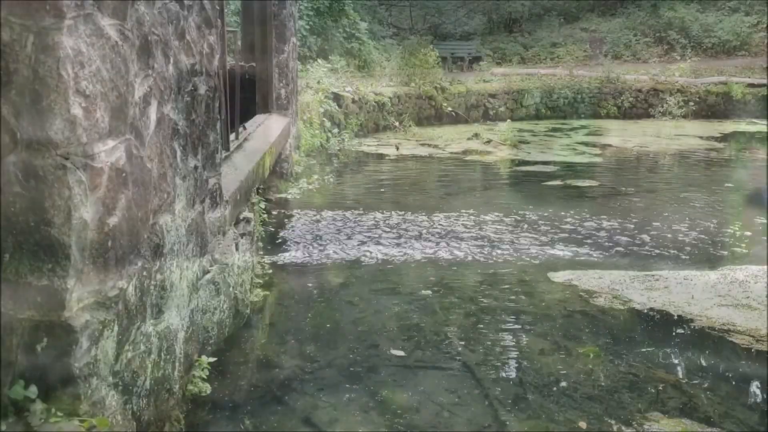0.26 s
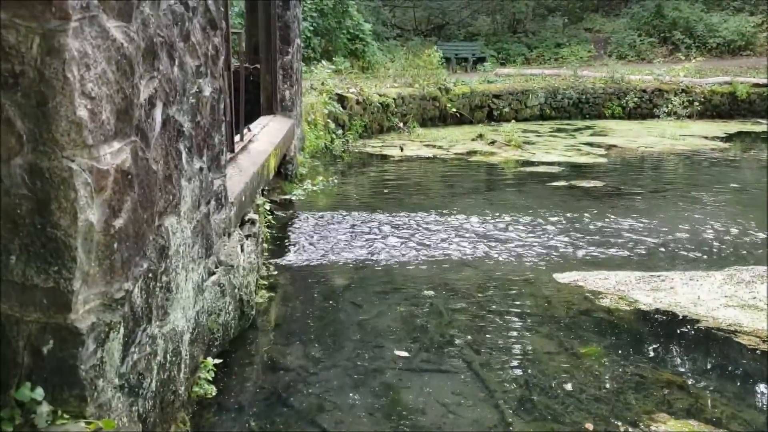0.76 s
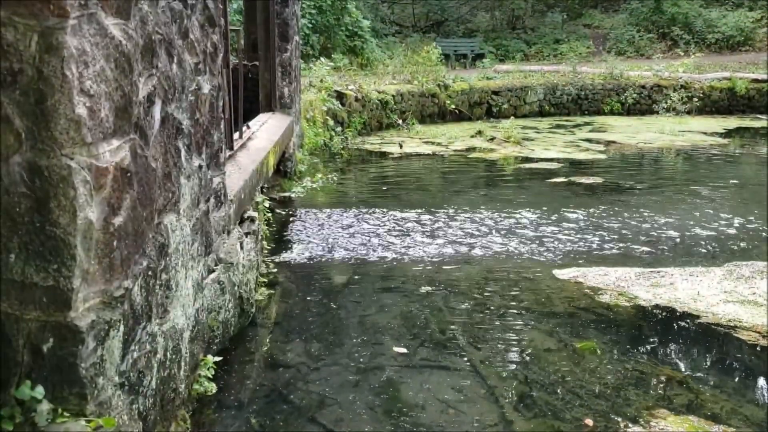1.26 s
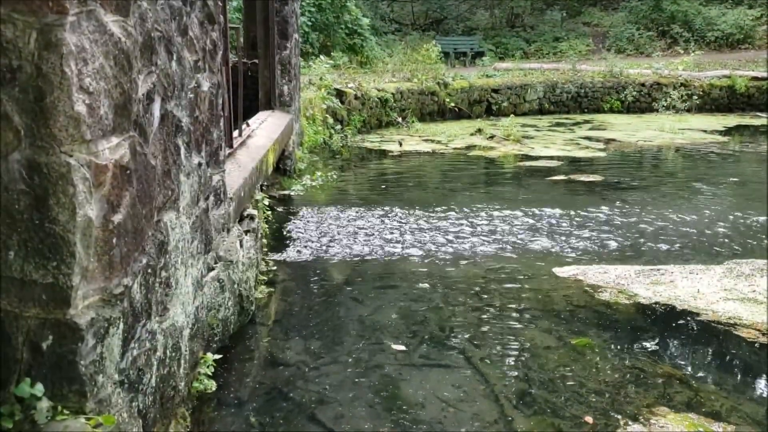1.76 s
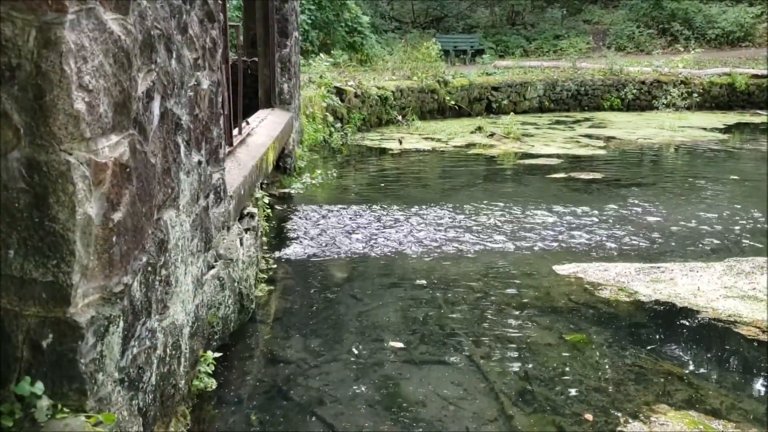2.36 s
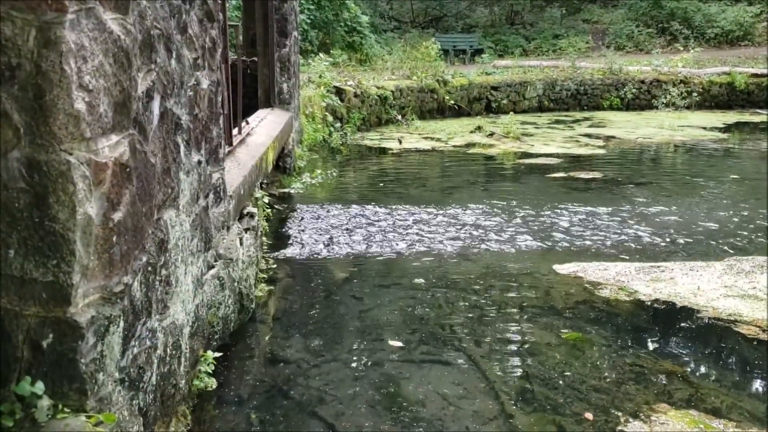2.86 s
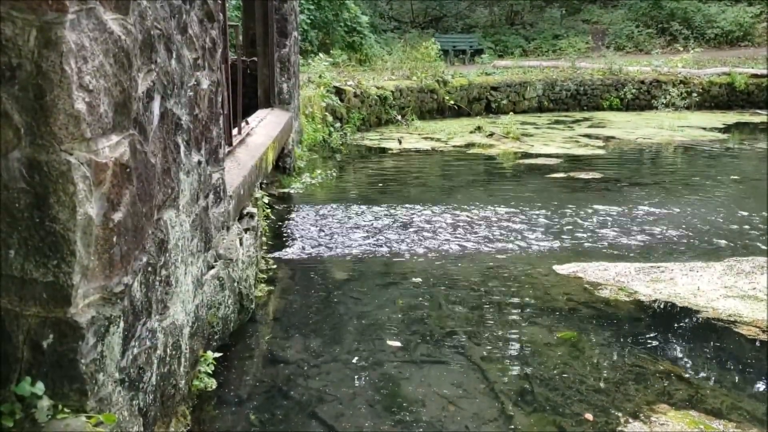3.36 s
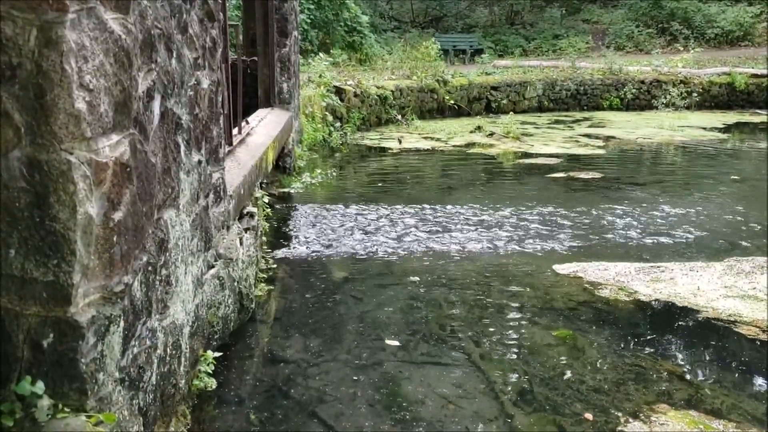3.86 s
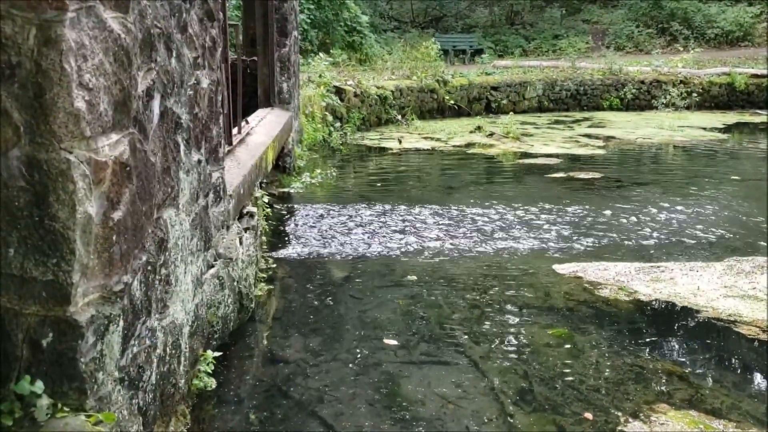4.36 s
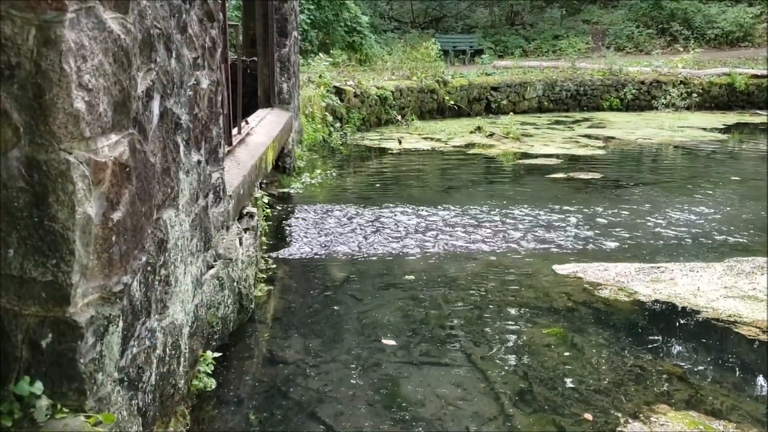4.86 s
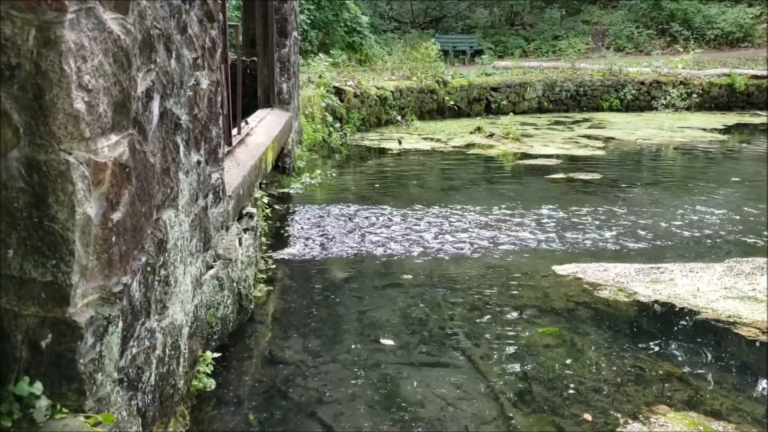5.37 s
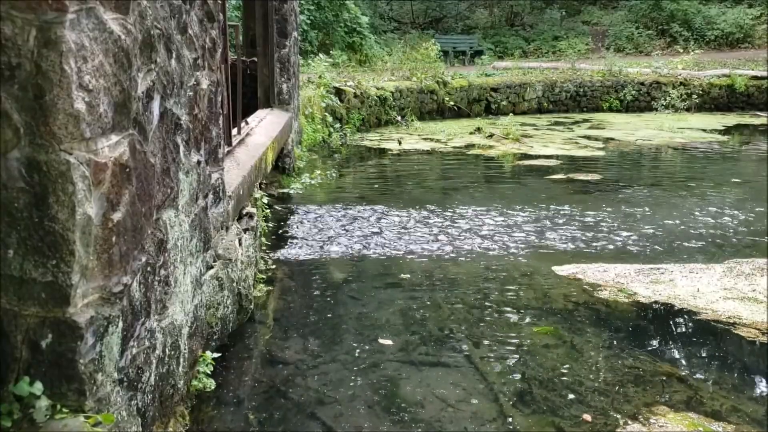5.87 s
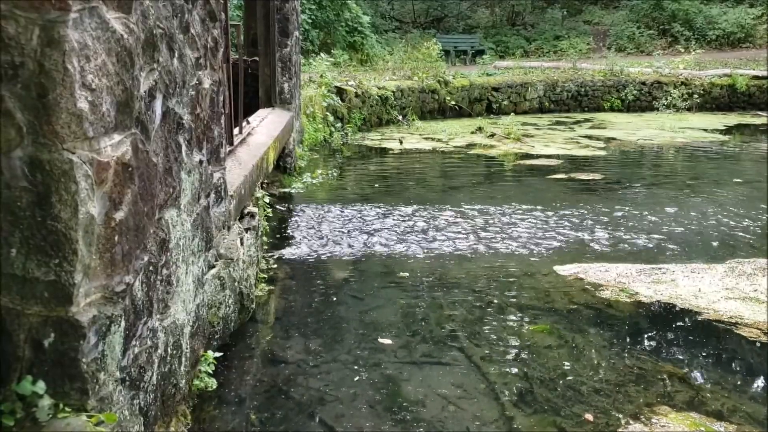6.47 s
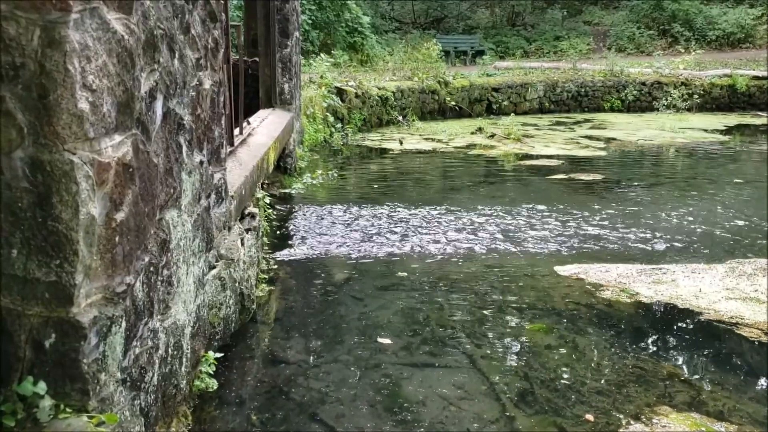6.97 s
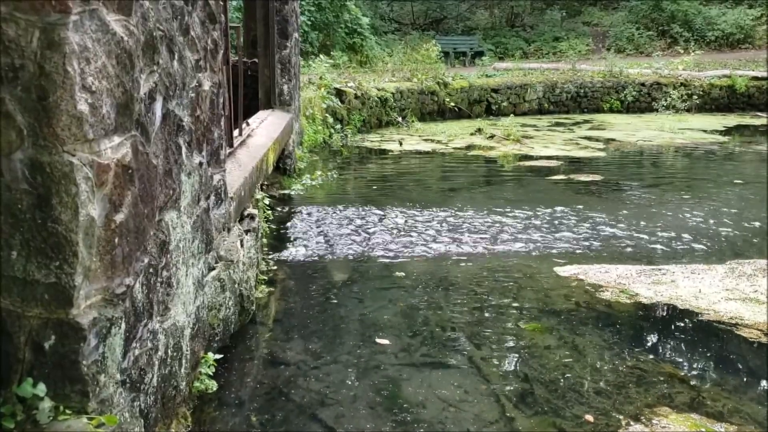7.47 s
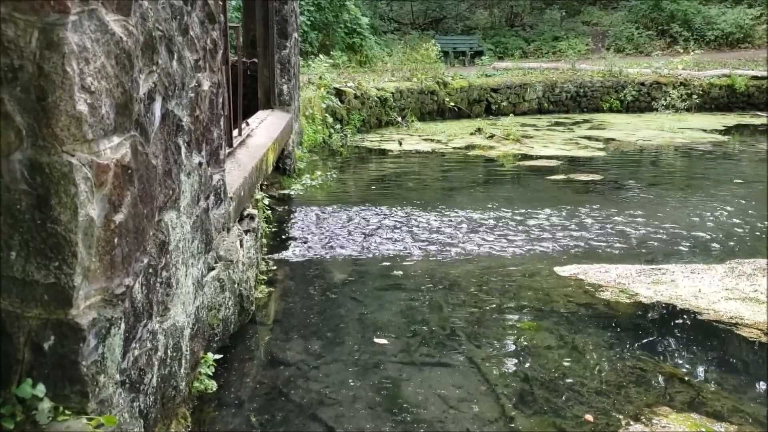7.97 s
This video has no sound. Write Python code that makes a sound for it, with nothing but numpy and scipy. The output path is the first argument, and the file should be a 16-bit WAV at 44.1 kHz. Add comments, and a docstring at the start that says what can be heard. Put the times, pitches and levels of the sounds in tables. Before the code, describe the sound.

An outdoor stereo soundscape at a wooded pond, lasting about eight seconds. It opens quietly, sinks a little further until 0.8 s, then rises to almost full level by 2 s and stays there. Cicadas dominate: a bright, continuous buzzing drone, strongest around 7 kHz, with several near singers entering and leaving over a far hissing chorus, their metallic overtones gently shifting. To the right, a very high insect rasps in about thirteen throbs a second, ending near 4 s. Throughout, small hollow bubbles gurgle irregularly into a stone drain, with busy clusters around 3-4 s and 5-6 s and a short echo. Faint handling bumps occur at 0.3 s, then dull knocks at 3.9, 4.4 and 5.0 s, with crisp rustles near 3.1, 4.9 and 5.5 s, a sharp tick at 5.6 s and a last soft knock at 8.1 s. Distant traffic, a beating low hum and light air lie underneath.

```python
"""Cicadas drone in the trees round a pond: nine near click trains, scattered by echoes, over a hiss of far ones.
A higher insect rasps in throbs of filtered noise, then stops. Water gurgles into a stone drain as sliding sines.
Now and then a hand knocks or brushes the camera: decaying sines and short noise bursts.
Filtered noise, engine notes and a beating hum make a low rumble with uneven air.
The whole scene starts low, dips further, then rises to almost full level by two seconds."""
import sys
import numpy as np
from scipy import signal
from scipy.fft import rfft, irfft, next_fast_len
from scipy.io import wavfile
from scipy.ndimage import uniform_filter1d

SR = 44100
rng = np.random.default_rng(int(sys.argv[2]) if len(sys.argv) > 2 else 0)


def undo_db(level):
    """Turn decibels back into plain size, where 20 dB means ten times bigger."""
    steps = np.asarray(level, float) / 20
    return 10 ** steps


def inscribe(sig):
    """Save sig as 16-bit PCM at rate SR to the path in sys.argv[1].

    A 1-D sig is mono; a 2-D sig holds one channel per row.
    Samples are clipped to [-1, 1] before scaling.
    """
    pcm = np.round(np.clip(np.atleast_2d(sig).T, -1, 1) * 32767)
    wavfile.write(sys.argv[1], SR, pcm.astype(np.int16))


N = 362502
TIME = np.arange(N) / SR
SIDES = np.array([[.5], [-.5]])  # share of a left-minus-right dB figure


def rms_one(x):
    """Scale to an rms of 1."""
    return x / np.sqrt(np.mean(x ** 2))


def over_hz(table, hz):
    """Read a (frequency [Hz], value) table on a log-frequency axis."""
    table_hz, values = np.transpose(table)
    return np.interp(np.log(hz + 1), np.log(table_hz), values)


def over_time(table):
    """Read a (time [s], value) table at every sample."""
    return np.interp(TIME, *np.transpose(table))


def shape(x, gain_at):
    """Filter by a gain given as a function of frequency."""
    size = next_fast_len(x.shape[-1])
    spectrum = rfft(x, size) * gain_at(np.fft.rfftfreq(size, 1 / SR))
    return irfft(spectrum, size)[..., :x.shape[-1]]


def walk(rate_hz, size=N):
    """Random levels held 1 / rate_hz and slewed twice; spread near 1."""
    hold = int(SR / rate_hz)
    steps = np.repeat(rng.standard_normal(size // hold + 1), hold)
    return 1.62 * uniform_filter1d(uniform_filter1d(steps, hold), hold)[:size]


def add(out, x, start_s, pan_db):
    """Mix a short sound in at start_s, panned by left minus right dB."""
    i = max(int(start_s * SR), 0)
    out[:, i:i + x.shape[-1]] += undo_db(pan_db * SIDES) * x[..., :N - i]


# click rate of each near cicada, one table a song: (time [s], rate [Hz])
SONG_RATES = [
    [(0.0, 210.76), (0.56, 210.79)],
    [(0.23, 212.99), (2.18, 212.25), (2.74, 211.07)],
    [(0.33, 180.34), (1.15, 180.75), (2.2, 180.3), (2.88, 178.4)],
    [(0.51, 191.9), (1.49, 192.75), (2.28, 192.25)],
    [(0.14, 207.47), (1.76, 208.23), (3.9, 208.67), (5.5, 208.55), (6.97, 207.9), (7.48, 206.95)],
    [(2.6, 198.98), (4.23, 198.28), (6.1, 197.75), (6.5, 196.76), (7.15, 196.36), (7.66, 195.1)],
    [(3.53, 188.14), (4.18, 188.96), (4.5, 190.89), (5.3, 192.02), (6.8, 192.25), (7.76, 191.96),
     (8.22, 191.18)],
    [(3.2, 212.84), (4.18, 213.03), (5.0, 214.36), (6.13, 214.42), (6.46, 213.68), (7.11, 213.81),
     (8.22, 213.48)],
    [(5.8, 210.83), (8.22, 211.2)],
]
# level of each song at full swell and fastest rate: (level [dB])
SONG_LEVELS = [-53, -49, -48, -53, -50, -49, -47.5, -54, -54.5]
# overtones that the echoes favour for a while, one table a song, level before clear_db and sway:
# (multiple of click rate [1], clearest time [s], level re song [dB], left minus right [dB])
FAVOURED_OVERTONES = [
    [],
    [(29, 1.4, -12, 4), (35, 1.7, -4, -6)],
    [(33, 1.6, -11, 2), (43, 1.4, -9, 2), (44, 1.7, -10, -1), (48, 1.6, -12, -7)],
    [(31, 1.1, -8, 0), (32, 1.8, -5, 6), (45, 1.5, -7, -7)],
    [(34, 5.9, -10, -3), (36, 6.0, -7, 0), (38, 4.8, -5, 3), (39, 2.1, -8, 0), (40, 3.0, -9, -2),
     (42, 4.9, -10, 11), (46, 2.9, -10, -2), (48, 4.6, -10, -5), (52, 5.7, -12, -12)],
    [(34, 6.2, -11, -2), (36, 5.2, -9, -6), (38, 5.8, -10, -1), (40, 5.4, -5, 3), (42, 4.2, -8, -2),
     (48, 3.9, -10, -6), (65, 3.6, -12, -15)],
    [(35, 6.5, -9, -6), (37, 5.5, -10, -2), (38, 6.5, -10, -4), (39, 5.9, -9, -4), (40, 6.6, -9, 1),
     (42, 6.3, -13, 4), (44, 7.0, -13, -2)],
    [(35, 6.5, -5, -2), (36, 5.9, -8, 1), (37, 6.0, -7, 1)],
    [(40, 7.3, -6, -5), (41, 7.0, -11, -6), (56, 7.5, -11, -15), (60, 7.0, -10, -10)],
]
# far chorus before its flicker: (time [s], level [dB])
CHORUS_LEVEL = [(0.0, -45.5), (1.9, -44), (3.4, -44), (3.8, -45.5), (6.2, -46.5), (8.22, -44)]


def cicadas():
    """Near songs over countless far ones that blur into a hiss, flickering a little."""
    hiss = rms_one(shape(rng.standard_normal((2, N)), body))
    far = hiss * undo_db(over_time(CHORUS_LEVEL) + 0.4 * walk(12))
    return far + sum(song(*row) for row in zip(SONG_RATES, SONG_LEVELS, FAVOURED_OVERTONES))


def song(rates, full_db, overtones, wobble_s=3e-6, echo_t60_s=0.091, rest_db=-2.5, clear_db=-0.5,
         sway_db=1.5, shift_s=6.8, favour_s=1.9, sunk_max_db=9, swell_db=7., swell_s=1, sag_db_per_hz=1.8):
    """Near-periodic click train; trunks and leaves scatter it, differently for each ear."""
    s, hz = np.transpose(rates)
    span = slice(int(s[0] * SR), min(int(s[-1] * SR), N))
    t = TIME[span]
    rate_hz = np.interp(t, s, hz)
    cycles = np.cumsum(rate_hz) / SR + hz[0] * wobble_s * walk(30, size=len(t))
    turn = 2 * np.pi * cycles

    # equal overtones up to 16 kHz
    top = 2 * int(16000 / hz.max()) + 1
    clicks = np.sin(top * turn / 2) / (np.sin(turn / 2) + 1e-9)
    # favoured overtones leave the train and are played on their own
    for row in overtones:
        clicks = clicks - 2 * np.cos(row[0] * turn)

    lag_s = TIME[:6000]
    paths = rng.standard_normal((4, len(lag_s))) * undo_db(-60 * lag_s / echo_t60_s)
    echoes = signal.oaconvolve(clicks[None], paths, axes=1)[:, :len(t)]
    # the echo pattern shifts slowly as branches move
    drift = np.pi * t / shift_s
    echoes = echoes[:2] * np.cos(drift) + echoes[2:] * np.sin(drift)
    heard = undo_db(rest_db) * rms_one(shape(echoes, body))

    for multiple, clearest_s, over_db, pan_db in overtones:
        # 6 dB down favour_s either side of the clearest moment
        sunk_db = np.minimum(6 * ((t - clearest_s) / favour_s) ** 2, sunk_max_db)
        # leaves move in the breeze
        sway = sway_db * np.array([walk(5, size=len(t)), walk(5.01, size=len(t))])
        tone = np.sqrt(2) * np.sin(multiple * turn + 2 * np.pi * rng.random((2, 1)))
        heard = heard + undo_db(over_db + clear_db + pan_db * SIDES + sway - sunk_db) * tone

    # no ramp where a song is already sounding at the start or still sounding at the end
    since_start = t - s[0] + (s[0] == 0)
    until_end = s[-1] - t + (s[-1] > 8.2)
    edge = np.clip(np.minimum(since_start, until_end) / .15, 0, 1)
    below_db = swell_db * np.clip(1 - (t - s[0]) / swell_s, 0, s[0] > 0)
    sag_db = sag_db_per_hz * (hz.max() - rate_hz)  # softer below its fastest rate
    out = np.zeros((2, N))
    out[:, span] = heard * edge * undo_db(full_db - below_db - sag_db)
    return out


# cicada body as heard through the leaves: (frequency [Hz], relative density [dB per Hz])
BODY_COLOUR = [(1940, -52.5), (3300, -33), (3480, -39), (3660, -26), (3940, -23.5), (4260, -14.5),
               (4790, -10.5), (7410, 3.5), (8720, -3.5), (10500, -5.5), (12600, -6), (14500, -18.5),
               (15700, -25.5)]
# the two microphone ports: (frequency [Hz], left minus right [dB])
PORT_BALANCE = [(100, .5), (400, 2), (1300, 0.5), (4400, -1), (8000, 0), (10000, -3), (12500, -9),
                (15000, -16.5)]


def body(hz):
    """Colour of the cicada sound at the left and right port."""
    return undo_db(over_hz(BODY_COLOUR, hz) + SIDES * over_hz(PORT_BALANCE, hz))


def katydid(rasp_db=-59.5, centre_hz=13100.0, width_hz=920.0, throb_hz=13.0, stop_s=4.0):
    """A higher insect to the right rasps noise in quick throbs, then stops."""
    noise = rng.standard_normal((2, N))
    rasp = rms_one(shape(noise, lambda f: np.exp(-((f - centre_hz) / width_hz) ** 2)))
    throb = np.cos(np.pi * np.cumsum(throb_hz * (1 + 0.041 * walk(2.5))) / SR) ** 2
    stop = np.clip((stop_s - TIME) / .3, 0, 1)
    return rasp * throb * stop * undo_db(rasp_db - 13 * SIDES)


def bubble(hz, rise_oct, length_s, attack_s=0.00038, fade_s=0.011):
    """A bubble rings while it forms, its pitch sliding as it nears the surface, then dies fast."""
    slide_s = max(length_s, .004)
    t = TIME[:int((slide_s + 5 * fade_s) * SR)]
    turn = 2 * np.pi * np.cumsum(hz * 2 ** (rise_oct * t / slide_s)) / SR
    fade = np.exp(-np.clip(t - length_s, 0, None) / fade_s)
    return (1 - np.exp(-t / attack_s)) * fade * np.sin(turn)


# clear bubbles, level before the drain:
# (time [s], level [dB], start pitch [Hz], pitch change [octaves], length [s])
CLEAR_BUBBLES = [(0.536, -59, 960, 0.19, 0.018), (0.581, -60, 930, 0.27, 0.017),
                 (0.69, -58.5, 730, -0.1, 0.0067), (0.904, -60.5, 720, 0.14, 0.02),
                 (1.061, -64.5, 710, 0.15, 0.024), (1.24, -67, 903, 0.45, 0.043),
                 (1.448, -67.5, 1203, 0.28, 0.065), (1.507, -68, 1060, -0.075, 0.018),
                 (1.782, -57, 936, 0.28, 0.011), (1.88, -57.5, 847, -0.17, 0.024),
                 (2.243, -67, 517, 0.62, 0.061), (2.295, -70, 1260, -0.18, 0.011),
                 (2.722, -65, 735, -0.3, 0.026), (3.054, -59, 715, 0.17, 0.015),
                 (3.096, -62, 1455, -0.055, 0.027), (3.128, -59.5, 1148, -0.41, 0.021),
                 (3.254, -66, 670, 0.3, 0.026), (3.344, -63, 1010, -0.11, 0.048),
                 (3.524, -61.5, 712, 0.16, 0.026), (3.849, -65, 734, 0.083, 0.016),
                 (3.879, -57.5, 672, 0.26, 0.021), (3.979, -54.5, 652, 0.55, 0.032),
                 (4.274, -68, 984, 0.19, 0.041), (4.337, -62, 1032, -0.01, 0.01),
                 (4.429, -58, 712, 0.24, 0.028), (4.481, -69, 1170, 0.15, 0.014),
                 (4.724, -59.5, 787, -0.013, 0.02), (4.855, -57.5, 1010, 0.01, 0.0035),
                 (5, -68, 988, -0.03, 0.033), (5.102, -61.5, 738, 0.094, 0.0093),
                 (5.191, -59.5, 732, 0.17, 0.011), (5.26, -55.5, 1068, 0.04, 0.013),
                 (5.279, -60.5, 1574, -0.14, 0.03), (5.3, -62, 1050, 0.022, 0.0087),
                 (5.355, -59, 666, 0.2, 0.021), (5.415, -66.5, 720, 0.42, 0.037),
                 (5.665, -57.5, 728, 0.26, 0.021), (5.776, -55, 663, -0.1, 0.015),
                 (5.798, -57, 773, 0.04, 0.013), (5.899, -59, 1162, -0.085, 0.0094),
                 (6.109, -66, 927, 0.26, 0.044), (6.367, -64, 1057, 0.19, 0.034),
                 (6.405, -53.5, 967, 0.11, 0.013), (6.444, -64.5, 697, 0.23, 0.024),
                 (6.89, -61, 736, 0.09, 0.06), (7.014, -62.5, 783, 0.077, 0.0088),
                 (7.124, -65, 840, -0.11, 0.014), (7.302, -59, 1015, 0.35, 0.026),
                 (7.502, -59, 998, 0.22, 0.026), (7.588, -68, 1325, 0.01, 0.017),
                 (7.724, -63.5, 982, -0.06, 0.04), (7.986, -71, 1376, -0.071, 0.011)]
# air column of the drain: (resonance [Hz], width [Hz], gain [dB])
DRAIN_MODES = [(780, 116, -9.5), (1010, 140, 1), (1304, 151, 1), (1553, 96, -5)]


def drain(small_db=-77.0, spread_db=3.0, slosh_db=5.0, flutter_db=1.0, gulp_s=0.064, crowd_db=-8.0,
          faint_db=-75.5, direct_db=-21.0, wall_db=-6.0, wall_t60_s=0.14, shift_s=4e-5):
    """Clear, faint and small bubbles, echoed by stone and coloured by the drain's air column."""
    small = np.zeros((2, N))
    for when, pitch, size, rise, side in rng.random((2500, 5)):
        hz = 620 * 2 ** (1.9 * pitch)
        drop = bubble(hz, 0.25 * rise, 8 / hz, fade_s=0.0076)
        add(small, undo_db(-spread_db * np.log(1 - size)) * drop, when * N / SR, 8 * (side - .6))

    out = np.zeros((2, N))
    for s, db, hz, rise_oct, length_s in CLEAR_BUBBLES:
        add(out, undo_db(db) * bubble(hz, rise_oct, length_s), s, -1.)
    # water comes in gulps: the small bubbles crowd round the clear ones
    window = int(gulp_s * SR)
    gulp = np.sqrt(uniform_filter1d(uniform_filter1d(out[0] ** 2, window), window) + 1e-14)

    for when, pitch, size, rise, length in rng.random((45, 5)):
        faint = bubble(700 * 2 ** (.95 * pitch), .5 * rise - .17, .008 + 0.0298 * length)
        add(out, undo_db(faint_db + 4.8 * size) * faint, when * N / SR, -1.)
    out = out * undo_db(flutter_db * walk(90))  # the heaving surface flutters the level
    out = out + rms_one(small) * (undo_db(small_db + slosh_db * walk(9)) + undo_db(crowd_db) * gulp)

    lag_s = TIME[:8000]
    walls = rng.standard_normal((2, len(lag_s))) * undo_db(-60 * lag_s / wall_t60_s)
    walls = walls / np.sqrt(np.sum(walls ** 2, axis=1, keepdims=True))
    out = out + undo_db(wall_db) * signal.fftconvolve(out, walls, axes=1)[:, :N]

    def column(f):
        # the drain lies to one side: left is advanced and right delayed by shift_s
        shift = np.exp(2j * np.pi * f * shift_s * 2 * SIDES)
        modes = sum(undo_db(db) / (1 + 2j * (f - hz) / width_hz) for hz, width_hz, db in DRAIN_MODES)
        return shift * (undo_db(direct_db) + np.abs(modes))

    return shape(out, column)


# knocks on the camera body: (time [s], level [dB], pitch [Hz], t60 [s])
HAND_KNOCKS = [(0.295, -63, 248, 0.04), (0.346, -56.5, 85, 0.24), (3.894, -50, 320, 0.025),
               (3.912, -53.5, 218, 0.02), (4.355, -52.5, 195, 0.027), (5.02, -54, 166, 0.016),
               (8.149, -59.5, 121, 0.028)]
# rustles and ticks of the hand:
# (time [s], level [dB], centre [Hz], width [Hz], length [s], left minus right [dB])
HAND_RUSTLES = [(0.303, -61.5, 1520, 2520, 0.043, 1), (3.11, -45, 12500, 4000, 0.065, 2),
                (3.117, -59.5, 1800, 2530, 0.073, -4), (4.387, -58, 2400, 2000, 0.0071, -10),
                (4.423, -64, 2670, 2000, 0.12, 0), (4.598, -63.5, 2950, 1940, 0.034, -3),
                (4.914, -46.5, 11800, 6000, 0.048, -10), (4.919, -60, 4100, 2480, 0.03, 3),
                (5.514, -48, 12300, 2000, 0.029, -14), (5.527, -50, 5000, 1460, 0.018, -9),
                (5.56, -68, 2840, 2000, 0.076, 1), (5.607, -33, 12400, 1300, 0.0032, -9)]


def hand(rattle_db=-5.0, rattle_s=0.022):
    """Dull decaying knocks, each with a short noise rattle, and brief crackly rustles."""
    out = np.zeros((2, N))
    t = TIME[:6000]
    for s, db, hz, t60_s in HAND_KNOCKS:
        blow = np.sin(2 * np.pi * hz * t) * undo_db(-60 * t / t60_s)
        noise = rng.standard_normal(len(t))
        noise = rms_one(shape(noise, lambda f: 1 / (1 + ((f - hz) / 200) ** 2)))
        rattle = undo_db(rattle_db) * noise * np.exp(-t / rattle_s)
        add(out, undo_db(db) * (1.1 * blow + rattle), s, 1.5)

    for s, db, hz, width_hz, length_s, pan_db in HAND_RUSTLES:
        noise = rng.standard_normal((2, len(t)))
        noise = rms_one(shape(noise, lambda f: np.exp(-((f - hz) / width_hz) ** 2)))
        crackle = uniform_filter1d(np.repeat(rng.standard_normal(60), 100), 60)
        noise = noise * undo_db(5.2 * crackle)
        # quick to start, slower to end
        steepness = np.where(t < t.mean(), 3., 1.6)
        swell = np.exp(-((t - t.mean()) / length_s * steepness) ** 2)
        burst = rms_one(noise * swell) * np.sqrt(np.mean(swell ** 2))
        add(out, undo_db(db) * burst, s - t.mean(), pan_db)
    return out


# far traffic: (frequency [Hz], relative density [dB per Hz])
TRAFFIC_COLOUR = [(12, -29), (20, -10), (59, 0.5), (96, 2), (120, -4), (156, -6.5), (400, -24.5),
                  (520, -31), (880, -120)]
# air and leaves: (frequency [Hz], relative density [dB per Hz])
AIR_COLOUR = [(120, -34), (200, 0), (559, -5), (1010, -6), (1170, -2), (2300, -5), (3480, -10),
              (4000, -7.5), (5200, -53), (8800, -120)]
# air and leaves before random unevenness: (time [s], level [dB])
AIR_LEVEL = [(0.0, -72.5), (0.45, -72.5), (0.7, -74), (3.6, -75), (5.7, -71.5), (6.2, -75), (8.22, -75)]
# far engine notes: (start [s], end [s], start pitch [Hz], end pitch [Hz], peak level before panning [dB])
ENGINE_NOTES = [(2.848, 3.8, 82.1, 78, -68.5), (3.596, 4.2, 71.9, 62.3, -73), (5.499, 6.5, 92.7, 93, -76.5),
                (7.703, 8.6, 94.3, 92, -72)]


def rumble(traffic_db=-73.5, swell_db=1., hum_db=-74.0, pump_hz=113.8, beat_s=.49):
    """Far traffic with a few engine notes, two pumps beating against each other, and uneven air."""
    out = wide_noise(TRAFFIC_COLOUR) * undo_db(traffic_db + swell_db * walk(2.62))
    out = out + wide_noise(AIR_COLOUR) * undo_db(over_time(AIR_LEVEL) + walk(12))
    # two tones either side of pump_hz
    beat = np.cos(np.pi * (TIME - 1.92) / beat_s)
    out = out + undo_db(hum_db) * beat * np.sin(2 * np.pi * pump_hz * TIME)
    for start_s, end_s, from_hz, to_hz, db in ENGINE_NOTES:
        u = np.linspace(0, 1, int((end_s - start_s) * SR))
        turn = 2 * np.pi * np.cumsum(from_hz + (to_hz - from_hz) * u) / SR
        add(out, undo_db(db) * np.sin(np.pi * u) * np.sin(turn), start_s, 1.)
    return out


# likeness of left and right: (frequency [Hz], correlation [0-1])
LIKENESS = [(30, .35), (130, 0.56), (400, 0.31), (1500, 0), (4000, 0.06)]


def wide_noise(colour):
    """Noise of a given colour, more alike in both ears in the bass; rms 1."""
    def alike(f):
        return np.clip(over_hz(LIKENESS, f), 0, 1)

    mid, side = rng.standard_normal((2, N))
    mid = shape(mid, lambda f: undo_db(over_hz(colour, f)) * np.sqrt(1 + alike(f)))
    side = shape(side, lambda f: undo_db(over_hz(colour, f)) * np.sqrt(1 - alike(f)))
    return rms_one(shape(mid + 2 * SIDES * side, lambda f: undo_db(SIDES * over_hz(PORT_BALANCE, f))))


def scene():
    """Insects, drain, rumble and hand."""
    return cicadas() + katydid() + drain() + rumble() + hand()


def roll_off(x):
    """The treble ends steeply here."""
    return signal.sosfilt(signal.butter(12, 15790, fs=SR, output="sos"), x)


# fader on the whole scene: (time [s], gain [dB])
FADER = [(0.0, -8), (0.23, -10.5), (0.78, -12), (1.94, -0.5), (8.22, 0)]


def record(dry):
    """Ride the fader over the whole mix and finish it."""
    mix = dry * undo_db(over_time(FADER))
    return roll_off(mix)


dry = scene()
out = record(dry)
inscribe(out)
```